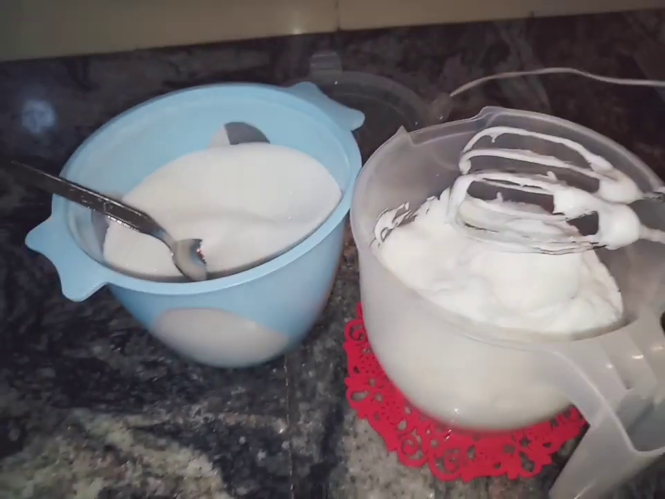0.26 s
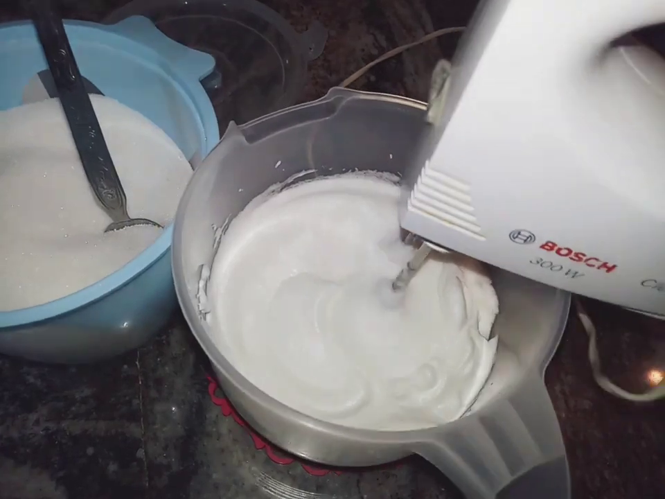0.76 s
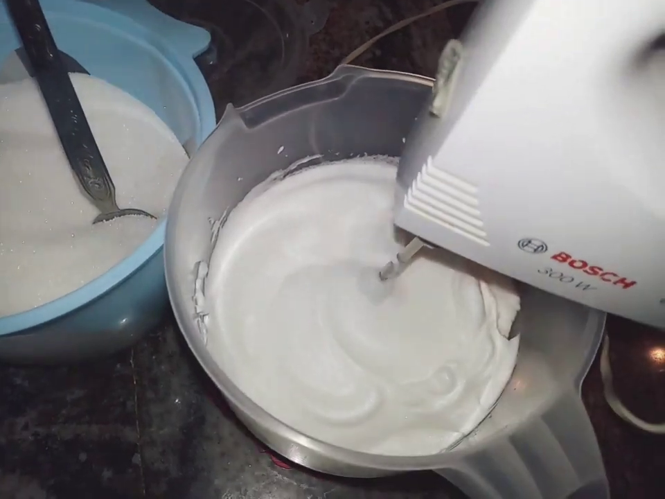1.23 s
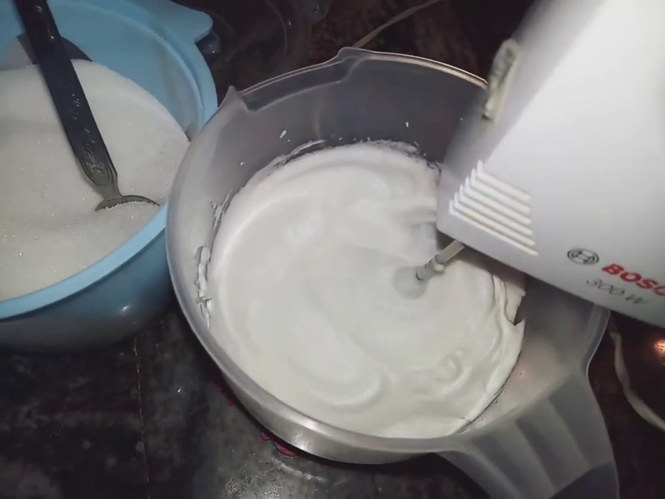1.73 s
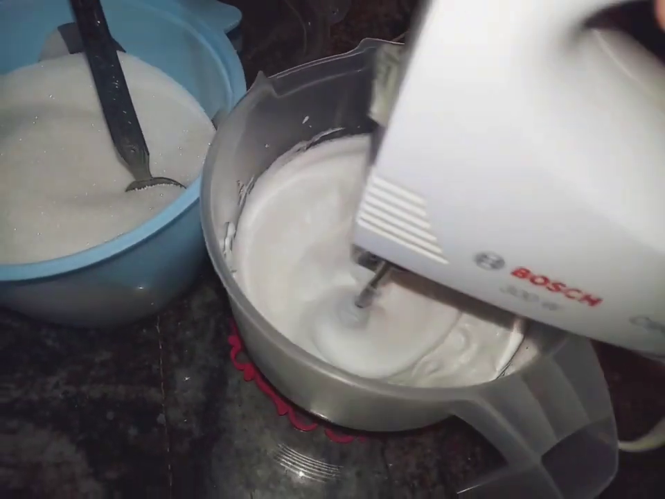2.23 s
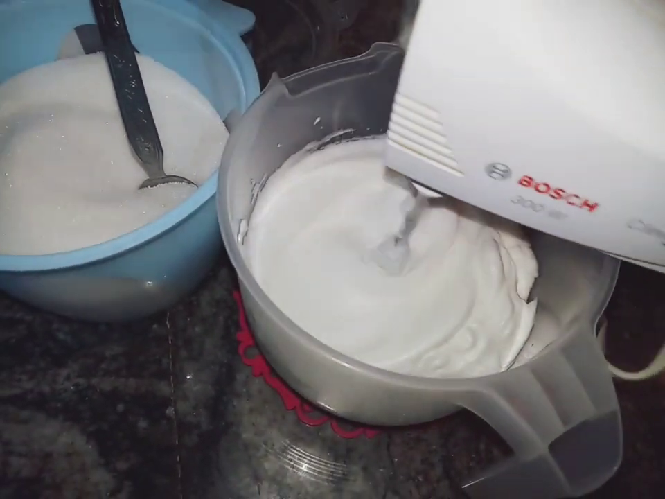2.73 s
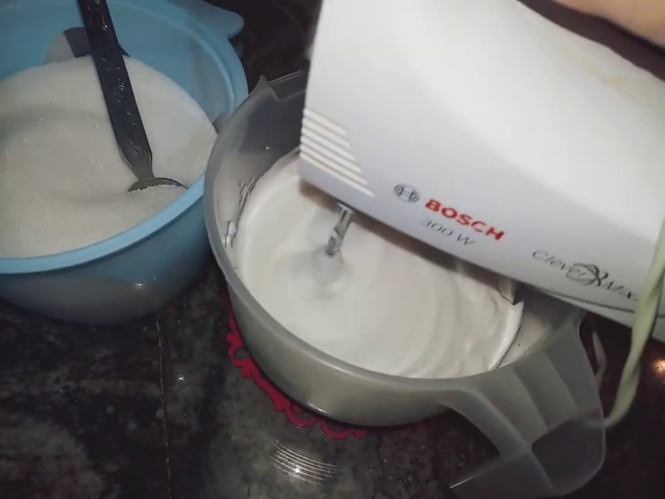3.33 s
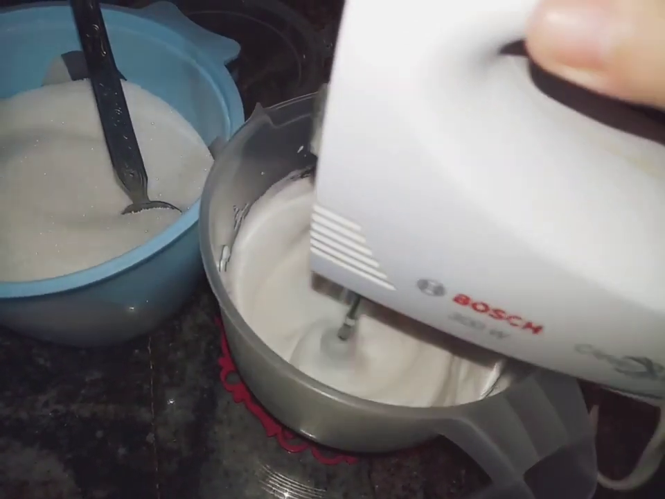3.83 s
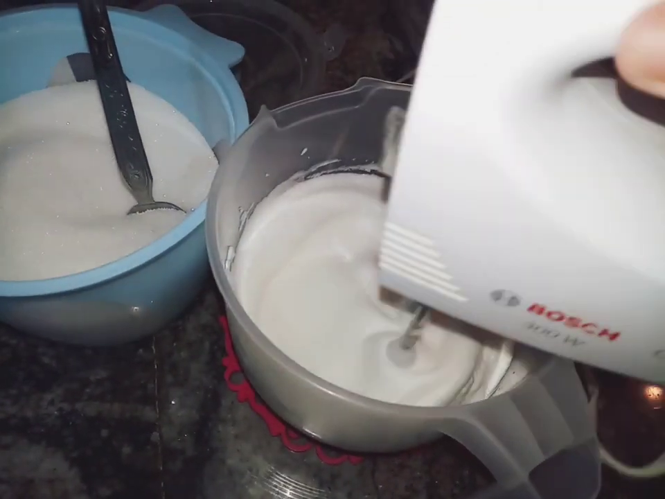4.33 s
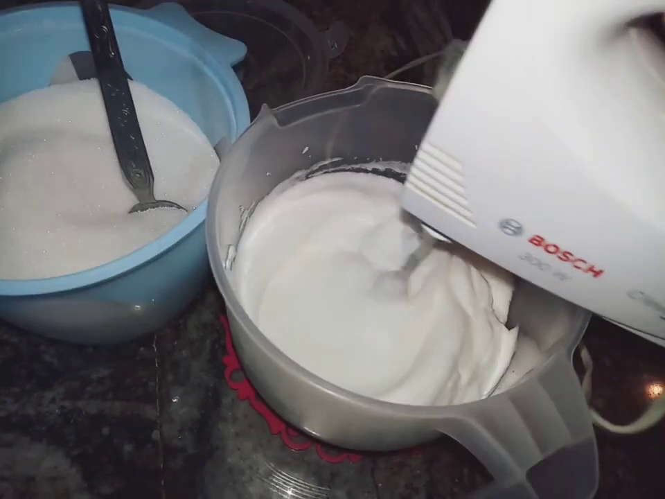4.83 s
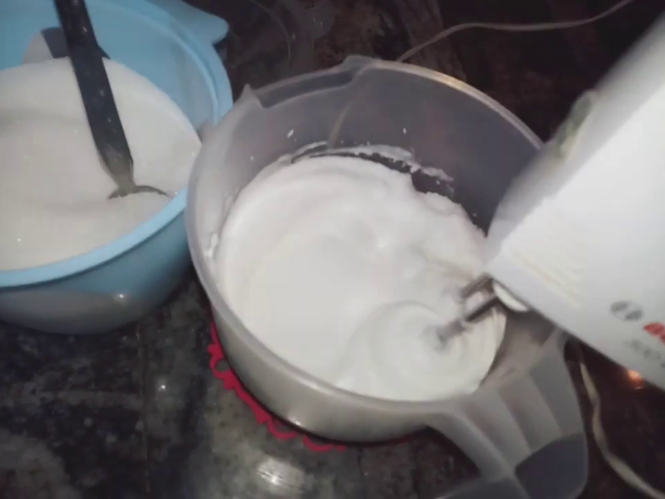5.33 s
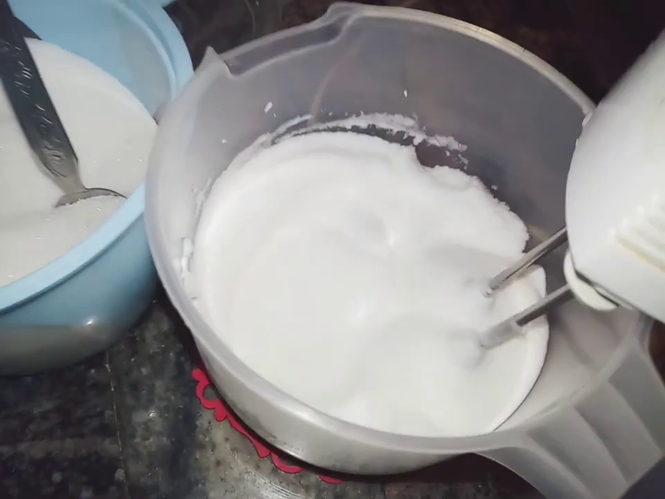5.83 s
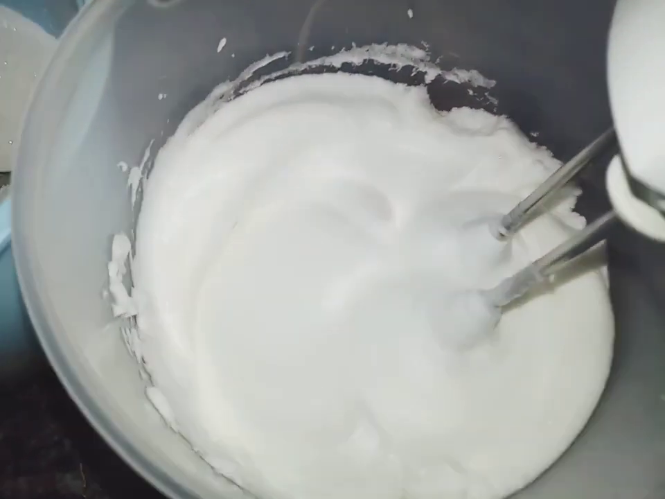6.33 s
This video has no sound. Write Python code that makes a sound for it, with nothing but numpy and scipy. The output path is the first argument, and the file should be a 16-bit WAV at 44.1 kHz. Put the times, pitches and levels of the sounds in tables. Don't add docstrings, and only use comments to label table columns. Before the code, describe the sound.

For the first 0.3 seconds there is only quiet room air and a faint fridge hum with thin high tones. It cuts to complete silence, and at about 0.45 a low, soft pop opens onto a hand mixer already running. The motor holds a nearly steady high whine over rough fan and gear noise, with a low hum that swells and fades. Until 1.7 the beater wires scrape and rattle quickly on the plastic jug. A narrow air whistle follows to 2.4, with light taps from 2.15 and a hard, rapid grind at 2.3 to 2.5. Clusters of clear taps come around 2.9 to 3.05, 3.7 and 4.3, with scrapes near 4.6 and 4.9. From 5.0 to 5.6 the wires clatter densely along the wall. Then the whirr becomes airy and whistling, with sparse knocks near 5.9, 6.1 and 6.45, still running at the 6.6 end.

```python
import sys
import numpy as np
from scipy import signal
from scipy.fft import rfft, irfft
from scipy.io import wavfile
from scipy.ndimage import uniform_filter1d, map_coordinates

SR = 44100
rng = np.random.default_rng(int(sys.argv[2]) if len(sys.argv) > 2 else 0)


def transcribe(u):
    v = np.clip(np.atleast_2d(u).T, -1, 1)
    q = np.round(v * 32767).astype(np.int16)
    wavfile.write(sys.argv[1], SR, q)


def makeup_ratio(level_db):
    decades = np.asarray(level_db, float) / 20
    return 10 ** decades


N = 290178
T = np.arange(N) / SR
MAINS_HZ = 50.2
WIRE_RATIO = 42.3


def evened(x):
    return x / np.sqrt(np.mean(x ** 2) + 1e-20)


def read(points, hz):
    f, value = np.transpose(points)
    return np.interp(np.log(hz + 1), np.log(f + 1), value)


def curves(rows, t=T):
    s, *columns = np.transpose(rows)
    return [np.interp(t, s, c) for c in columns]


def faced(values, facing):
    return sum(np.multiply.outer(v, np.clip(1 - abs(facing - k), 0, 1)) for k, v in enumerate(values))


def drift(per_s):
    steps = rng.standard_normal(int(N / SR * per_s) + 3)
    return map_coordinates(steps, [T * per_s], order=3)


def coloured(x, points):
    return irfft(rfft(x) * makeup_ratio(read(points, np.fft.rfftfreq(len(x), 1 / SR))), len(x))


def rung(x, modes):
    out = 0
    for hz, width, db in modes:
        peak = signal.iirpeak(hz, hz / width, SR)
        out = out + makeup_ratio(db) * signal.lfilter(*peak, signal.lfilter(*peak, x))
    return out


# (frequency [Hz], level [dB per Hz])
ROOM_AIR = [(30, -10), (106, -17), (600, -22), (780, -39), (1540, -31.5), (1960, -39), (3150, -21),
            (3700, -30), (4600, -20), (5500, -21.5), (6400, -34), (8150, -36), (8400, -44), (13000, -62)]
# (frequency [Hz], level [dB])
FRIDGE_TONES = [(100, -58), (197, -66), (248, -66), (1530, -82), (592, -69), (2440, -66), (3195, -68),
                (4620, -65), (7450, -73), (5276, -70), (4366, -73), (422, -72)]


def kitchen():
    out = makeup_ratio(-56.5) * evened(coloured(rng.standard_normal(N), ROOM_AIR))
    for hz, db in FRIDGE_TONES:
        swell = 1 if hz < 2000 else .15 + 4.8 * T if hz < 2600 else .8
        out += makeup_ratio(db + 2.5 * drift(20.4)) * np.sin(2 * np.pi * hz * T) * swell
    return out


# (time [s], level [dB], length [ms], sign)
INPUT_POPS = [
    (0.437, -27, 17, 0.44),
    (0.45, -29, 6, -1.2),
]


def pops():
    out = np.zeros(N)
    for s, db, ms, sign in INPUT_POPS:
        u = np.clip((T - s) * 1000 / ms, 0, 1)
        out += sign * makeup_ratio(db) * np.sin(np.pi * u ** 0.53)
    return out


# (time [s], commutator frequency [Hz])
MOTOR_SPEED = [(.45, 2254), (1.3, 2250), (1.55, 2243), (2.22, 2308), (2.5, 2300), (2.7, 2304), (2.97, 2287),
               (3.42, 2312), (3.72, 2297), (4.0, 2308), (4.2, 2306), (4.42, 2293), (4.6, 2301),
               (4.83, 2333), (5.0, 2324), (5.45, 2283), (5.9, 2295), (6.58, 2302)]


def commutator_hz():
    return curves(MOTOR_SPEED)[0]


# (time [s], vent facing [0-2], whirr level [dB], whine beam [dB])
HANDLING = [(.45, 0.51, -28, -2), (1.0, 0.27, -25.5, 3.5), (1.6, 0.46, -26.5, 0), (1.85, 1.36, -31, 1),
            (2.25, 1.1, -29, -2), (2.5, 0.57, -28, 4.5), (2.95, 1.3, -29, 0.5), (3.4, 1.07, -28.5, 1.5),
            (3.9, 1.03, -28, 2), (4.2, 1.2, -28, 3), (4.65, 0.72, -26, 1), (4.78, 0.96, -28.5, 3),
            (4.97, 0.7, -26, -3), (5.2, 0.51, -25.5, -10), (5.5, 0.98, -25.5, -4), (5.7, 2, -27.5, 4.5),
            (6.1, 2.153, -28.5, -1.5), (6.58, 2.11, -24.5, -4)]


def handling(t=T):
    return curves(HANDLING, t)


# (time [s], hum level [dB])
BEARING_DOWN = [(.45, -59), (.62, -47), (1.6, -51.5), (2.29, -57.5), (2.43, -41), (2.8, -62), (2.9, -55),
                (3.1, -72), (3.19, -45), (3.28, -62.5), (3.8, -52.5), (4.08, -63), (4.36, -57), (4.46, -50),
                (5.04, -63), (5.12, -54), (5.34, -66), (5.55, -52), (6.58, -52)]
SHAFT_LEVELS = (-45, -57.5, -60.5)
# (middle time [s], half length [s], level [dB])
COUNTER_DRONE = [
    (.7, 0.83, -52),
    (1.73, 0.37, -62),
    (5.403, 0.29, -51),
    (6.5, 0.53, -65),
]


def hum():
    facing = handling()[0]
    turn = 2 * np.pi * np.cumsum(commutator_hz()) / SR
    tones = makeup_ratio(-2 + 4 * drift(6)) * np.sin(4 * np.pi * MAINS_HZ * T)
    tones += makeup_ratio(-.5 + 3.7 * drift(6.5)) * np.sin(2 * turn / WIRE_RATIO)
    shaft = makeup_ratio(faced(SHAFT_LEVELS, facing) + 3.4 * drift(5)) * np.sin(turn / 12 + .5 * drift(9))
    press = sum(makeup_ratio(db) * np.exp(-((T - s) / half) ** 2) for s, half, db in COUNTER_DRONE)
    drone_turn = turn / 33.6
    drone = press * makeup_ratio(.98 * drift(7.1)) * (.9 * np.sin(drone_turn) + .94 * np.sin(2 * drone_turn))
    return np.sqrt(2) * (makeup_ratio(curves(BEARING_DOWN)[0]) * tones + shaft + drone)


# (start time [s], end time [s], frequency [Hz], width [Hz], level [dB])
NARROW_BANDS = [
    (1.68, 2.4, 4640, 60, -40),
    (2.44, 3.4, 4640, 81, -44.5),
    (5.72, 7.4, 4000, 98, -45),
    (5.75, 6.7, 2450, 220, -40),
    (5.42, 5.78, 6850, 110, -41),
    (5.6, 7.6, 14300, 2400, -46),
    (6.5, 7.4, 10000, 500, -50),
    (.5, 1.7, 292, 12, -44.5),
    (.5, 1.8, 328, 10, -47),
]


def vents(swell_s=.06):
    air = rng.standard_normal(N)
    out = np.zeros(N)
    for start, end, hz, width, db in NARROW_BANDS:
        swell = np.clip(np.minimum(T - start, end - T) / swell_s, 0, 1)
        out += makeup_ratio(db) * evened(rung(air, [(hz, width, 0)])) * swell
    return out


# (frequency [Hz], then level in each of three facings [dB per Hz])
WHIRR_COLOUR = [(40.04, -34, -18, -36), (120, -9, -28, -3), (160, -7, -14, -11), (250, -7, -8.5, 1.5),
                (445, 2, -9, -5.5), (1020, -0.5, -9.5, -0.5), (1670, -3.5, -14, -8.5),
                (1800, -8, -7.5, -11), (2040, 2, -9.5, -0.5), (3200, -2.5, -5.5, -3.5),
                (4800, -9.5, -10, -7), (8300, -16, -17, -8), (9300, -20.5, -21, -12.5),
                (16000, -10, -17, -25.5)]
# (frequency [Hz], width [Hz], then lift in each of three facings [dB])
CASING_MODES = [(307.1, 14.5, 7, 11.5, 7.6), (1156, 330, -1.5, 5, 0.5), (2283, 220, 2, 6, 4.1),
                (4320, 610, 5.5, 3.5, 8.2), (4750, 140, 7, -1.5, 3.2), (5560, 410, 2, 6, 7.4),
                (7090, 450, 4.5, 6.5, 5.2), (14200, 3700, -22, -9.5, 2.5)]


def whirr_shape(hz, k):
    lift = sum(row[2 + k] / (1 + (2 * (hz - row[0]) / row[1]) ** 2) for row in CASING_MODES)
    return read([(row[0], row[1 + k]) for row in WHIRR_COLOUR], hz) + lift


def whirr(patchy_db=1.0, grit_db=1.0, beat=0.1):
    size, hop = 1024, 256
    frames, hz = N // hop + 5, np.fft.rfftfreq(size, 1 / SR)
    facing = handling(np.arange(frames) * hop / SR)[0]
    shape = makeup_ratio(faced([whirr_shape(hz, k) for k in range(3)], facing))
    shape /= np.sqrt((shape ** 2).sum(0))
    patches = rng.standard_normal((frames, size // 2 + 1)).T
    patches = evened(uniform_filter1d(uniform_filter1d(patches, 12, 0), 10, 1))
    wires = 1 + beat * np.cos(2 * np.pi * np.cumsum(commutator_hz() / WIRE_RATIO) / SR)
    drive = rng.standard_normal(N) * wires * makeup_ratio(grit_db * drift(500))
    drive = np.pad(drive, (0, frames * hop - N - hop))
    z = signal.stft(drive, nperseg=size, noverlap=size - hop)[2][:, :frames]
    z = z * shape * makeup_ratio(patchy_db * patches)
    out = signal.istft(z, nperseg=size, noverlap=size - hop)[1][:N]
    return makeup_ratio(handling()[1]) * evened(out)


# (commutator order, then level in each of three facings [dB])
WHINE_ORDERS = [(1, -57, -50, -52.5), (2, -50, -47.5, -55), (3, -56, -48, -43), (4, -70, -50, -54),
                (5, -58, -49, -55), (6, -65, -59, -60), (7, -56, -62, -62)]


def whine(waver_db=2.3):
    facing, _, beam_db = handling()
    mains = 2 * np.pi * MAINS_HZ * T
    turn = 2 * np.pi * np.cumsum(commutator_hz() + .6 * drift(8)) / SR
    turn += .5 * np.sin(mains) + .04 * drift(90)
    pull = 1 - 0.25 * np.cos(mains + 0.2)
    shaft_sideband = (1.895, -70, -62, -47)
    out = np.zeros(N)
    for order, *db in WHINE_ORDERS + [shaft_sideband]:
        level = makeup_ratio(faced(db, facing) + beam_db + waver_db * drift(4.35))
        out += np.sqrt(2) * level * pull * np.sin(order * turn)
    return out


# (frequency [Hz], level [dB per Hz])
SCRAPE_COLOUR = [(150, -25), (600, -4), (1600, -10), (2300, 4), (3500, 6.5), (5400, 4.5), (7600, -3.5),
                 (8800, -5.5), (9700, -20), (15500, -19)]


def wall_scrape(x):
    return coloured(x, SCRAPE_COLOUR)


# (frequency [Hz], width [Hz], level [dB])
JUG_MODES = [(514.4, 93.5, 4), (452, 74, 1.5), (411, 60, -6), (587, 120, -10), (299, 21, -11),
             (1090, 720, -10), (103, 13.4, -8.5)]


def jug_body(x):
    return rung(x, JUG_MODES)


# (time [s], level [dB])
BRUSH_LEVEL = [(.45, -38), (.8, -38), (1.3, -33), (1.68, -34.5), (1.8, -36.5), (2.28, -41), (2.4, -21),
               (2.5, -23.5), (2.56, -33.5), (2.9, -51), (3.05, -37), (3.12, -59), (4.5, -41), (4.58, -23.5),
               (4.72, -45), (5.1, -31.5), (5.75, -55), (6.58, -57)]


def brushing(strike_s, sharp=2.5):
    passes = np.cumsum(commutator_hz() / WIRE_RATIO) / SR
    slip = np.unwrap(np.interp(strike_s, T, passes) % 1, period=1)
    passes = np.maximum(passes - np.interp(T, strike_s, slip) + 0.27, 0)
    size = makeup_ratio(2.0 * rng.standard_normal(int(passes.max()) + 1))[passes.astype(int)]
    puff = (0.32 + size * np.sin(np.pi * passes) ** (2 * sharp)) * rng.standard_normal(N)
    return makeup_ratio(curves(BRUSH_LEVEL)[0]) * evened(wall_scrape(puff) + makeup_ratio(11.5) * jug_body(puff))


def grinding():
    return [(2.3365 + k * .01745, -10, 5.37, rng.uniform(2660, 3140)) for k in range(10)]


# (time [s], peak level [dB], rise [ms], wall pitch [Hz])
LEANING_SCRAPES = [(0.4669, -13.5, 7.5, 3470), (0.485, -24, 2.5, 4930), (0.528, -25, 4, 3200),
                   (0.557, -18, 5.9, 3280), (0.577, -16, 4.5, 2430), (0.626, -24, 2, 2720),
                   (0.653, -23, 4.6, 2900), (0.543, -10.5, 6, 4910), (0.5921, -15, 10.6, 2710),
                   (0.6374, -13.5, 1.55, 4970), (0.6708, -6, 3.35, 3920), (0.7084, -14.5, 6.6, 4880),
                   (0.741, -11.5, 8.6, 3450), (0.7867, -9, 2.55, 5080), (0.8191, -7.5, 3.2, 5660),
                   (0.857, -11.5, 0.82, 2210), (0.893, -11.5, 7.6, 3460), (0.931, -11.5, 1, 2870),
                   (0.967, -11.5, 8.2, 4600), (1.0099, -9.5, 3.55, 2350), (1.0473, -9, 1.95, 4070),
                   (1.085, -12.5, 5.1, 3900), (1.109, -15, 3.2, 4970), (1.121, -8.5, 5.7, 5120),
                   (1.1466, -11.5, 2.8, 5100), (1.182, -8, 4.2, 5170), (1.196, -23, 4, 2600),
                   (1.257, -11.5, 5, 4880), (1.286, -18, 2.7, 3440), (1.3067, -21, 3.5, 3370),
                   (1.330, -14.5, 7.2, 2390), (1.347, -16, 3, 3560), (1.3702, -17, 2.5, 5420),
                   (1.387, -20, 4, 4800), (1.419, -14.5, 3.4, 3200), (1.4275, -13.5, 6.3, 3950),
                   (1.4542, -12, 5.8, 3250), (1.469, -16, 2, 3800), (1.4907, -10.5, 7.5, 2710),
                   (1.5076, -13.5, 2.2, 3820), (1.533, -10, 3.1, 3220), (1.565, -11.5, 7.7, 2884),
                   (1.582, -13, 5.1, 2800), (1.605, -11.5, 4.4, 8170), (1.639, -12.5, 2.1, 3260),
                   (1.643, -8, 3.5, 6390), (1.660, -15.5, 3.7, 8300)]
# (time [s],
# peak level [dB], rise [ms], wall pitch [Hz])
STRAY_SCRAPES = [(0.5072, -18.5, 4, 4320), (0.612, -12.5, 3.6, 5840), (2.515, -19, 4.4, 3180),
                 (2.531, -15.5, 4.2, 2720), (2.555, -16, 1.8, 5330), (2.5865, -22, 2, 2780),
                 (2.853, -16, 4.2, 2850), (2.8679, -6, 2.07, 2750), (2.875, -14, 2.8, 2840),
                 (2.944, -6.5, 1.8, 2800), (3.182, -17, 2.3, 1800), (3.4073, -22.5, 1.5, 4965),
                 (3.253, -26, 2.3, 3900), (3.9929, -19, 3.4, 3440), (4.046, -20.5, 3.6, 4030),
                 (4.064, -15.5, 2.2, 2410), (4.073, -16, 4.8, 3260), (4.167, -20, 2.8, 5460),
                 (4.9868, -22, 2, 5140), (4.5417, -10.5, 6.1, 3550), (4.528, -20, 5.01, 2890),
                 (4.5608, -7.5, 3.3, 4220), (4.5767, -7.5, 2.96, 5200), (4.591, -8.5, 6.2, 3850),
                 (4.612, -14.5, 4.8, 5350), (4.6469, -14, 3.9, 2670), (4.6639, -16, 5.9, 3310),
                 (4.856, -10.5, 1.1, 3750), (4.8673, -13.5, 6.2, 5580), (4.9227, -13, 2.7, 5060),
                 (4.9397, -17, 2.94, 3700), (4.9586, -13, 1.9, 5250), (5.6215, -17, 4.8, 4490),
                 (5.638, -14, 6.9, 4080), (5.6969, -15.5, 5.2, 5540), (5.712, -15.5, 3.9, 4210),
                 (5.724, -16.5, 4.2, 3200), (5.8684, -11.5, 1.8, 2760), (6.066, -18.5, 3.1, 4270),
                 (6.089, -19.5, 1.7, 850), (6.4478, -15.5, 2.4, 954), (5.8695, -17, 1.6, 850),
                 (6.4486, -20, 1.55, 2400)]
# (time [s], peak level [dB], rise [ms], wall pitch [Hz])
PASS_ALONG = [(5.0349, -9.5, 4.1, 2870), (5.0500, -10.5, 6.7, 4200), (5.069, -7.5, 1.9, 2930),
              (5.107, -8.5, 2.2, 2765), (5.1226, -9, 5.7, 3400), (5.143, -12, 2.5, 2870),
              (5.164, -17, 2.5, 2820), (5.1801, -6.5, 1.1, 2890), (5.195, -10, 5.6, 3200),
              (5.2156, -9, 1.4, 2860), (5.237, -18, 1.8, 2570), (5.2527, -8.5, 2.9, 5000),
              (5.268, -10.5, 5.8, 2440), (5.2888, -10, 1.9, 2965), (5.3102, -21, 2.8, 4660),
              (5.3238, -9, 6.4, 4800), (5.34, -10.5, 6.9, 2640), (5.358, -15, 4.4, 5220),
              (5.366, -15, 3.1, 3200), (5.3978, -10.5, 5.5, 4440), (5.414, -12, 5.9, 3680),
              (5.4347, -11.5, 3.1, 2830), (5.474, -14, 2.4, 4340), (5.488, -12.5, 6.6, 5070),
              (5.51, -12.5, 3.3, 3000), (5.5469, -12.5, 4, 4360), (5.562, -11, 5.4, 3430),
              (5.582, -16, 2.4, 3040)]
# (time [s], peak level [dB])
CLEAN_TAPS = [(2.1584, -19), (2.1774, -19.5), (2.2307, -17.5), (2.3076, -16.5), (2.8905, -11),
              (2.9112, -13), (2.9295, -8), (2.952, -10), (2.9672, -9.5), (2.9885, -14.5), (3.009, -13.5),
              (3.0241, -10.5), (3.042, -16), (3.2002, -13.5), (3.6606, -16.5), (3.6773, -14.5),
              (3.6996, -16), (3.7581, -16), (4.259, -15), (4.2798, -14), (4.3201, -15.5), (4.3358, -9.5),
              (4.3562, -10.5), (4.415, -10.5), (4.438, -11.5), (3.029, -20), (3.0459, -14), (4.5585, -10),
              (4.574, -9), (4.9994, -13.5), (5.0174, -17), (5.0906, -15)]
# (time [s], thud level [dB])
JUG_SHAKE = [(.45, -12), (1.2, -12.5), (1.6, -12), (2.16, -10.5), (2.4, -7), (2.52, -8), (2.87, -12.5),
             (3.2, -6), (3.68, -5), (4.07, -8), (4.3, -7), (4.57, -7), (4.65, -15), (4.9, -12), (5.2, -29),
             (5.7, -11.5), (6.1, -18), (6.45, -9)]


def blows():
    grind = grinding()
    rows = [(*row, -4) for row in LEANING_SCRAPES + STRAY_SCRAPES + PASS_ALONG]
    rows += [(*row, -2.5) for row in grind]
    landings = [(row[0], -18) for row in grind[:-1]]
    rows += [(s, db, 1.575, 2890, 5) for s, db in CLEAN_TAPS + landings]
    s, db, rise, hz, ring_db = np.transpose(sorted(rows))
    chance = rng.standard_normal((len(s), 3)).T
    thud_db = curves(JUG_SHAKE, s)[0] + 0.5 * (rise - 4) + 1.5 * chance[0]
    hz = hz * (1 + 0.012 * chance[1])
    ring_db = ring_db + 2.5 * chance[2] * (ring_db < 0)
    return np.transpose([s, db, rise, hz, ring_db, thud_db])


def contact(t, rise, tap, late, fall_ms=2.88, jump=0.48, rebound=0.3):
    dip = (1 - jump) * np.tanh(rise / 0.5) * (.5 if late else 1)
    fall = np.exp(-(t - rise) / fall_ms / (0.66 if tap else 1))
    shape = np.where(t < rise, 1 - dip * (1 - (t / rise) ** 2), fall)
    return shape + late * rebound * np.exp(-((t - 4.8) / 3.8) ** 2 - rise / 2)


def wall_ring(t, n, shape, rise, hz, drag, tap, climb=0.2434, ring_cycles=4.0):
    turn = 2 * np.pi * np.cumsum(hz * (1 - climb * drag * np.clip(1 - t / rise, 0, 1))) / SR
    kicks = np.exp(1j * n[0]) * (t == 0) * (1 - drag)
    rub = 3.3 * (.3 if tap else 1) * drag ** 2 * shape * (t < max(rise + 1, 6))
    kicks = kicks + rub * (n + 1j * n[::-1])
    decay = np.exp(-hz / SR / ring_cycles / (1 - .5 * drag))
    swing = signal.lfilter([1], [1, -decay], kicks)
    return (swing / abs(swing).max() * np.exp(1j * turn)).real


def strikes(rows, ring_db=2.0, thud_db=14, chatter_db=4.5, snap_db=5.0, snap_ms=.45):
    scrape, ring, thud = np.zeros((3, N + 2000))
    t = np.arange(900) / SR * 1000
    for (s, db, rise, hz, wall_db, jug_db), n in zip(rows, rng.standard_normal((len(rows), 900))):
        tap = wall_db > 0
        rise = max(rise - 1 + 0.26 * (rise - 1.5), .2)
        drag = 1 - np.exp(-rise / 2.98)
        shape = contact(t, rise, tap, s > 2)
        at = slice(round(s * SR), round(s * SR) + 900)
        if tap:
            dull = signal.butter(4, 1.85 * hz, fs=SR)
        else:
            dull = signal.butter(2, min(2.23 * hz * (1 + 0.36 * drag ** 2), 9500), fs=SR)
        grit = signal.lfilter(*dull, n)
        chatter = makeup_ratio(chatter_db * evened(uniform_filter1d(n[::-1], size=24)))
        rub = evened(grit * chatter * shape) * np.sqrt(np.mean(shape ** 2))
        scrape[at] += makeup_ratio(db - 1.2 * tap) * rub
        scrape[at] += makeup_ratio(db + snap_db) * drag * np.exp(-abs(t - rise) / snap_ms) * n[::-1]
        ring[at] += makeup_ratio(db + wall_db + ring_db) * wall_ring(t, n, shape, rise, hz, drag, tap)
        thud[at] += makeup_ratio(db + jug_db + thud_db) * (n * shape + 34 * np.gradient(shape))
    noise_gain = np.std(wall_scrape(rng.standard_normal(N)))
    scrape = makeup_ratio(-8.5) * wall_scrape(scrape) / noise_gain
    ring = signal.lfilter(*signal.butter(3, 7500, fs=SR), ring)
    thud = signal.lfilter(*signal.butter(3, 85, "high", fs=SR), jug_body(thud))
    return (scrape + ring + thud)[:N]


def room(x, t60=0.097):
    at = np.arange(200, 12000, 22) + rng.integers(0, 22, 537)
    taps = np.zeros(12100)
    taps[at] = rng.choice([-1., 1.], len(at)) * makeup_ratio(-60 * at / SR / t60)
    return signal.oaconvolve(x, taps / np.linalg.norm(taps))[:N]


# (start time [s], end time [s])
SILENCE = (.2990, 0.4463)


def scene():
    rows = blows()
    knocks = signal.sosfilt(signal.butter(4, 80, "high", fs=SR, output="sos"), strikes(rows))
    mixer = whirr() + whine() + vents() + hum() + brushing(rows[:, 0]) + knocks + makeup_ratio(-11.0) * room(knocks)
    fade_in = np.clip((T - SILENCE[1]) / 0.033, 0, 1)
    mono = kitchen() * (T < SILENCE[0]) + mixer * fade_in + pops()
    return np.array([mono, mono])


# (middle time [s], low edge [Hz], high edge [Hz])
SCRAMBLED_BANDS = [(2.109, 9560, 11020), (2.738, 9560, 12400), (2.738, 14380, 15760), (3.319, 7490, 8960),
                   (3.626, 6800, 8350), (4.132, 12920, 14470), (4.224, 4480, 5680), (4.224, 7490, 8960),
                   (4.224, 10940, 12400), (4.759, 4570, 5770), (4.759, 6800, 8960), (5.989, 4050, 5170),
                   (5.989, 6800, 10340), (5.989, 12920, 14470)]


def scrambled(x, length_s=.026, make_up_db=3.0):
    hz, t, z = signal.stft(x, SR, nperseg=512)
    hit = sum(np.outer((hz > lo) & (hz < hi), abs(t - s) < length_s / 2) for s, lo, hi in SCRAMBLED_BANDS)
    loose = z * makeup_ratio(make_up_db) * np.exp(2j * np.pi * rng.random(z.shape))
    return signal.istft(np.where(hit, loose, z), nperseg=512)[1][:, :N]


def band_limit(x):
    return signal.sosfilt(signal.butter(12, 16110, fs=SR, output="sos"), x)


def record(dry):
    soft = .8 * np.tanh(dry / .8)
    band = signal.sosfilt(signal.butter(4, 50, "high", fs=SR, output="sos"), soft)
    top_cut = signal.firwin(1023, 15710, window=("kaiser", 9), fs=SR)
    band = signal.oaconvolve(band, top_cut[None], "same")
    return band_limit(scrambled(band))


dry = scene()
out = record(dry)
transcribe(out)
```